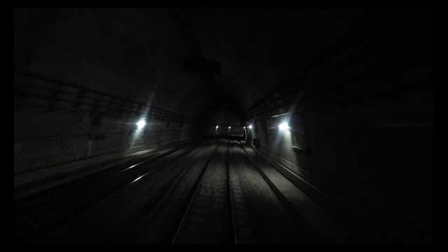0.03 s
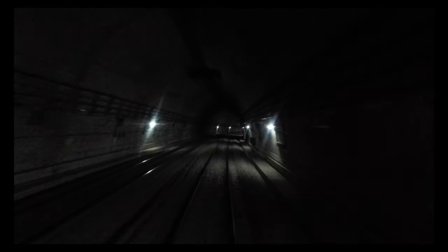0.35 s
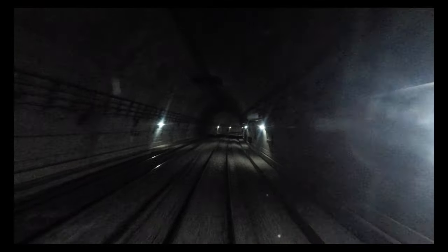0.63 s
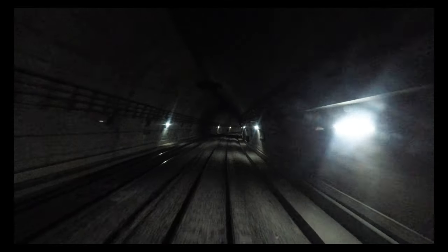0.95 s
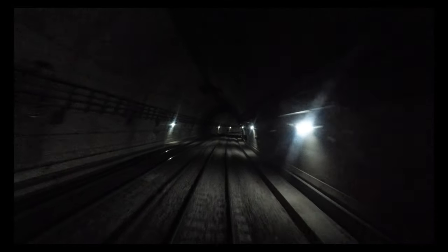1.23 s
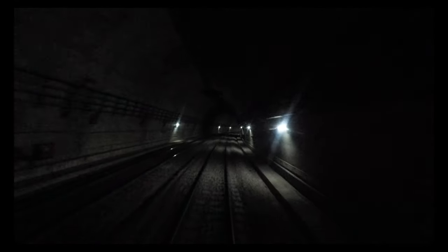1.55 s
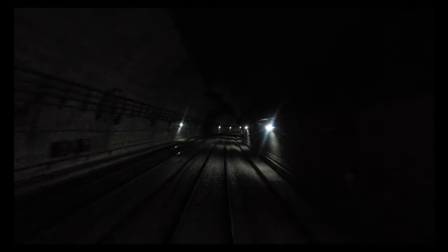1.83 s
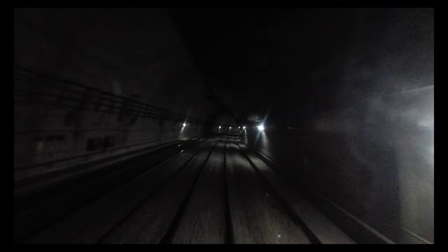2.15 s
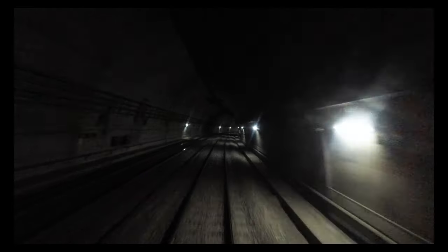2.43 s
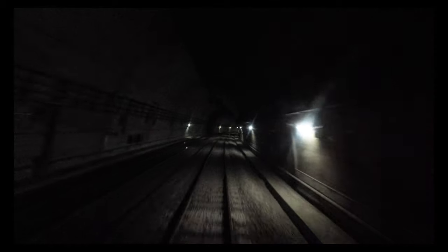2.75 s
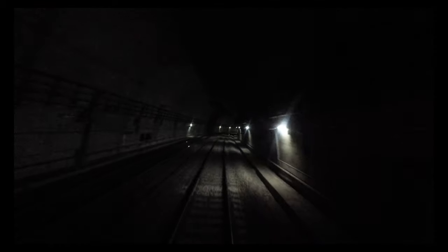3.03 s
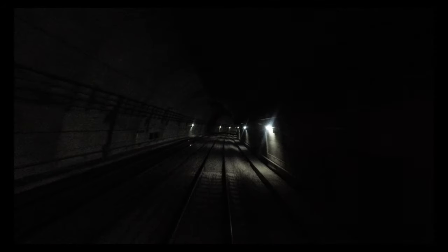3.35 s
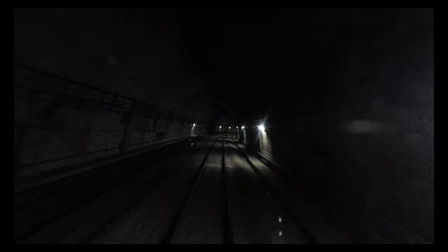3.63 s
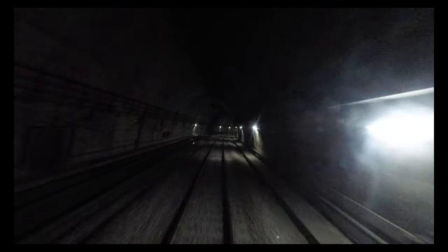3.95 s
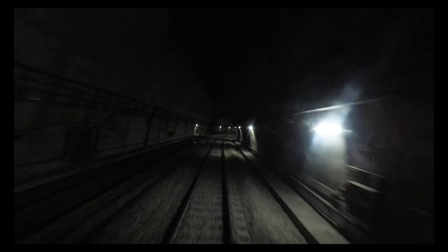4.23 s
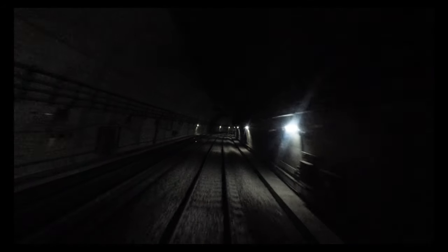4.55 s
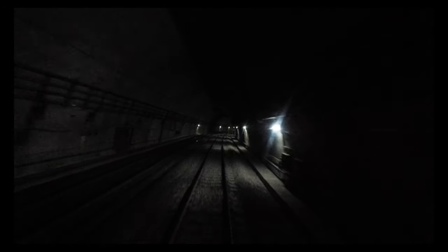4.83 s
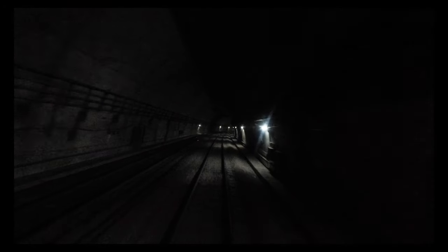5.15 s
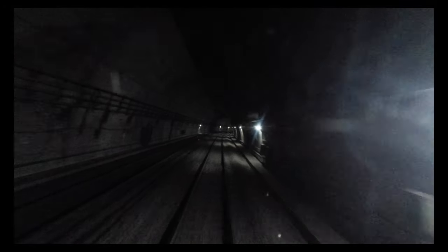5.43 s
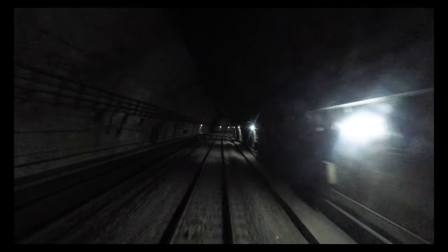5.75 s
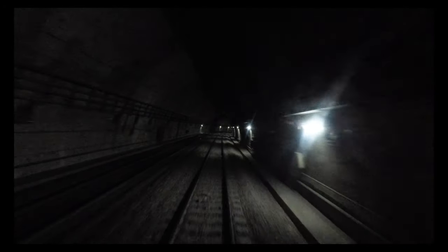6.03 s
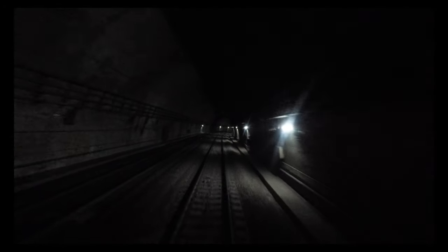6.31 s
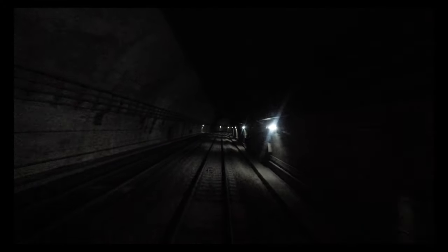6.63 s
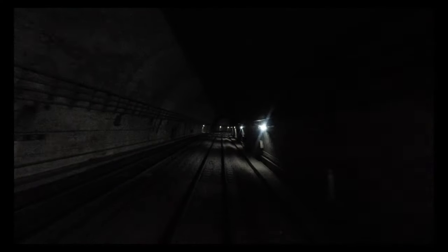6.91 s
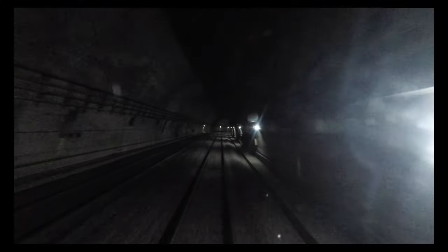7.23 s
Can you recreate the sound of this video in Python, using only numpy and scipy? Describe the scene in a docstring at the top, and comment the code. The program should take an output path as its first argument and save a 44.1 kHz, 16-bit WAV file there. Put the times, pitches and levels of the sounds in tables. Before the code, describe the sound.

Inside a train cab in a tunnel, a steady diesel drone and humming panels blend with rumbling wheels and faint rail hiss.

```python
"""A deep engine drone and a rumble of wheels fill the cab of a diesel train running through a tunnel.
The six-cylinder engine turns at a steady speed, ticking, clattering and making the cab panels hum.
The wheels rumble through the floor, their roar comes back off the tunnel wall, and air hisses past.
Uneven rail adds faint ringing hisses, the first just ahead of a double clack; later comes a dull bump."""
import sys
import numpy as np
from scipy import signal
from scipy.fft import rfft, irfft
from scipy.io import wavfile

SR = 44100
rng = np.random.default_rng(int(sys.argv[2]) if len(sys.argv) > 2 else 0)


def store_wav(level_fs):
    """Save 16-bit WAV to argv[1]."""
    pcm = np.round(np.clip(np.atleast_2d(level_fs), -1, 1) * 32767)
    wavfile.write(sys.argv[1], SR, pcm.T.astype(np.int16))


N = 321048
TIME = np.arange(N) / SR
FREQS = np.maximum(np.arange(N // 2 + 1) * SR / N, 1)

# Each cylinder fires once per engine cycle. An "order" is a tone at a whole multiple of the cycle rate.
CYCLE_HZ = 12.6015
BOOM_ORDERS, WHINE_ORDERS = (7, 12), (66, 67)
LOWER_BOOM_DB, UPPER_BOOM_DB, WHINE_DB = -26, -23, -43
SURGE_START_S, SURGE_RISE_S, SURGE_HOLD_S, SURGE_FALL_S, SURGE_DB = 2.35, 0.51, 0.54, 0.44, 7
SWAY_DB, SWAY_DB_PER_S = 1.5, -0.23

# Low engine tones (the two booming ones take their levels from above): order, relative_level_db
DRONE_TONES = [(2, -38.2), (3, -34.4), (4, -40.6), (5, -28.3), (6, -39.2), (7, -25.1), (8, -27.7),
               (9, -35.1), (10, -27.7), (11, -34.8), (12, -23.3), (13, -38.5), (14, -39.2), (15, -38.2),
               (16, -30.0), (17, -36.7), (18, -33.8), (20, -36.4)]
# Higher engine tones that set the cab panels humming: order, relative_level_db
HUM_TONES = [(28, -51), (30, -41.5), (31, -39), (32, -46), (33, -47), (35, -45), (37, -48), (39, -49),
             (45, -52), (51, -46), (53, -52), (54, -51), (55, -50.5), (59, -50), (63, -53), (64, -54),
             (73, -58), (78, -59), (83, -57.5), (90, -61), (94, -60), (101, -63), (105, -64)]
# Moments when the panel whine swells: middle_s, half_length_s, boost_db
WHINE_RISES = [(.55, 0.51, 4.5), (5.75, 0.2, 4.5)]
# Pitches the cab panels strengthen or weaken: pitch_hz, width_hz, boost_db
PANEL_RINGS = [(395, 50, 2), (505, 25, 3), (665, 50, 4), (720, 18, -3), (745, 20, 4), (770, 18, -3),
               (829, 30, 3), (930, 40, 3), (1003, 25, -4), (1045, 25, 6), (1082, 20, -3), (1130, 30, 4),
               (1185, 22, 3), (1275, 30, 5), (2160, 260, 3.5), (3880, 130, 5), (5870, 180, 3)]
# Tone colour of the engine's clatter: pitch_hz, level_db
CLATTER_SPECTRUM = [(200, -100), (340, -82), (450, -79.5), (600, -72.5), (850, -78.5), (1000, -76.5),
                    (1300, -92), (1750, -95), (2000, -88), (2600, -99), (4000, -99), (7000, -120)]
# Each cylinder's fuel injection tick, in firing order: relative_level_db
TICK_LEVELS = [0, -10, -6, -12, -7, -13]
# How the engine block rings: pitch_hz, width_hz, relative_level_db
BLOCK_RINGS = [(2102, 125, 0), (2230, 100, -6), (3880, 110, -17)]
# Tone colour of the swaying train body: pitch_hz, level_db
SWAY_SPECTRUM = [(5, -65), (12, -57), (18, -49), (28, -48.5), (38, -45.5), (52, -52), (68, -52), (100, -70),
                 (200, -110)]
# Lurches that rock the body: middle_s, half_length_s, boost_db
BODY_LURCHES = [(1.95, 0.21, 4), (3.55, 0.2, 9), (4.8, 0.14, 1)]
# Wheel rumble as the ride roughens and eases: time_s, level_db
RUMBLE_LEVELS = [(0, -22.5), (1.1, -26), (2.5, -27), (3.55, -21.5), (4.6, -25), (5.3, -30.5), (6.0, -28.5),
                 (7.28, -31.5)]
# Tone colour of the rumbling floor: pitch_hz, level_db
FLOOR_SPECTRUM = [(60, -79.5), (90, -49), (125, -57), (147, -48), (180, -50.5), (225, -54.5), (275, -63.5),
                  (330, -83), (600, -115)]
# Tone colour of the roar off the tunnel wall: pitch_hz, level_db
ROAR_SPECTRUM = [(150, -100), (310, -71), (375, -59), (490, -62.5), (560, -66), (850, -67), (1000, -73),
                 (1350, -75.5), (1800, -81.5), (2300, -80.5), (2800, -88), (4000, -90), (5200, -106),
                 (9000, -130)]
# Tone colour of the passing air: pitch_hz, level_db
AIR_SPECTRUM = [(2000, -125), (4500, -96), (5100, -99), (6200, -97), (7100, -101), (8400, -97),
                (10000, -100), (11300, -107), (14000, -112), (15200, -118)]
# A dull bump, then wheels hissing on the rail: start_s, rise_s, decay_s, level_db, pitch_hz, width_hz
RAIL_BURSTS = [(1.73, 0.06, 0.099, -38, 290, 80), (0.12, 0.07, 0.06, -62, 6560, 2000),
               (1.84, 0.07, 0.10, -62, 6500, 1500), (3.42, 0.06, 0.26, -63, 6540, 5000),
               (4.27, 0.17, 0.15, -61.5, 5200, 3000), (5.19, 0.02, 0.13, -65, 6500, 1100),
               (5.19, 0.02, 0.06, -64, 9500, 6000), (6.39, 0.04, 0.05, -65, 6150, 900)]
# The two blows of the track's clack: start_s, strength_db
CLACK_BLOWS = [(0.388, -29.5), (0.402, -34.5)]
# How the frame under the cab rings when struck: pitch_hz, width_hz, relative_level_db
FRAME_RINGS = [(503, 12, 4), (630, 70, -2), (810, 100, -2), (1120, 170, -8), (1730, 200, -17),
               (2020, 140, -18)]


def from_db(db):
    """Turn decibels into a number to multiply by."""
    return 10 ** (np.asarray(db) / 20)


def rms_one(x):
    """Scale a signal so its average level (rms) is 1."""
    return x / np.sqrt(np.mean(x ** 2) + 1e-20)


def drift(rate_hz):
    """A slow random wander, about 1 in size."""
    r = np.exp(-80 * np.pi * rate_hz / SR)
    noise = rng.standard_normal(N // 40 + 2002)   # one value every 40 samples, plus time to settle
    slow = signal.lfilter([1], [1, -2 * r, r * r], noise)[2000:]
    return np.interp(np.arange(N) / 40, np.arange(len(slow)), rms_one(slow))


def swells(rows):
    """Smooth rises and falls of level, in dB."""
    return sum(db * np.exp(-((TIME - s) / half_s) ** 2) for s, half_s, db in rows)


def burst(start_s, rise_s, decay_s):
    """A level that climbs in a straight line, then dies away."""
    age = TIME - start_s
    return np.clip(age / rise_s, 0, 1) * np.exp(-np.maximum(age - rise_s, 0) / decay_s)


def resonate(x, hz, width_hz):
    """Make a signal ring at one pitch; a narrower width rings longer."""
    r = np.exp(-np.pi * width_hz / SR)
    feedback = [1, -2 * r * np.cos(2 * np.pi * hz / SR), r * r]
    return signal.lfilter(np.array([1, 0, -1]) * (1 - r * r) / 2, feedback, x)


def narrow_noise(hz, width_hz):
    """Noise gathered around one pitch."""
    once = resonate(rng.standard_normal(N), hz, width_hz)
    return rms_one(resonate(once, hz, width_hz))


def colour(white, spectrum, peaks=()):
    """Give an even, hiss-like signal a tone colour, with extra peaks and dips."""
    hz, level_db = np.transpose(spectrum)
    shape_db = np.interp(np.log(FREQS), np.log(hz), level_db, right=-160)
    for peak_hz, width_hz, peak_db in peaks:
        shape_db += peak_db / (1 + (2 * (FREQS - peak_hz) / width_hz) ** 2)
    return irfft(rfft(white) * from_db(shape_db) * np.sqrt(SR / 2), N)


def engine_tone(cycles, order, waver_db):
    """One pure tone that keeps step with the engine and can waver in level."""
    lag = .078 * order * order   # higher tones arrive later through the body, blurring the firings
    tone = np.sqrt(2) * np.cos(2 * np.pi * (order * cycles - lag))
    return tone * from_db(waver_db * drift(1.22))


def drone(cycles):
    """Low engine tones fill the cab; higher ones hum in its panels."""
    low = sum(from_db(db) * engine_tone(cycles, order, waver_db=1.1)
              for order, db in DRONE_TONES if order not in BOOM_ORDERS)
    hum = sum(from_db(db) * engine_tone(cycles, order, waver_db=2.6) for order, db in HUM_TONES)
    return from_db(-0.46) * low + from_db(-1.06) * hum


def boom(cycles):
    """Two engine tones match pitches at which the cab's air rings; the lower one surges once."""
    age = TIME - SURGE_START_S
    rise = np.clip(age / SURGE_RISE_S, 0, 1)
    fall = np.clip((age - SURGE_RISE_S - SURGE_HOLD_S) / SURGE_FALL_S, 0, 1)
    lower = engine_tone(cycles, BOOM_ORDERS[0], waver_db=1.4)
    upper = engine_tone(cycles, BOOM_ORDERS[1], waver_db=0.0)
    return from_db(LOWER_BOOM_DB + SURGE_DB * (rise - fall)) * lower + from_db(UPPER_BOOM_DB) * upper


def panel_whine(cycles):
    """Two close tones throb against each other in one panel, which running noise also stirs."""
    strong, weak = (engine_tone(cycles, order, waver_db=2.0) for order in WHINE_ORDERS)
    whine = strong + from_db(-3.5) * weak + from_db(-4) * narrow_noise(hz=828, width_hz=36)
    return from_db(WHINE_DB + swells(WHINE_RISES)) * rms_one(whine)


def clatter(cycles):
    """All the fainter engine tones jumble into a rattle that repeats every cycle."""
    orders = np.exp(2j * np.pi * rng.random(600))   # equally strong, randomly timed
    already_played = [order for order, db in DRONE_TONES + HUM_TONES] + list(WHINE_ORDERS)
    orders[already_played] = 0
    pattern = irfft(orders, int(SR / CYCLE_HZ)) * np.sqrt(SR / CYCLE_HZ)
    rattle = np.interp(cycles * len(pattern), np.arange(len(pattern)), pattern, period=len(pattern))
    return colour(rattle, CLATTER_SPECTRUM, PANEL_RINGS)


def injection_ticks(cycles, first_s, decay_s, rattle_gain, level_db):
    """Six unequal fuel injection ticks ring the engine block, nearly alike in every cycle."""
    cylinders = len(TICK_LEVELS)
    firing = (cycles - first_s * CYCLE_HZ) * cylinders
    tick_number = np.floor(firing).astype(int)
    strength = from_db(TICK_LEVELS)[tick_number % cylinders]
    age = firing % 1 / (CYCLE_HZ * cylinders)
    blows = rms_one(np.diff(tick_number, prepend=tick_number[0]) * strength)
    rattle = rms_one(strength * np.exp(-age / decay_s) * rng.standard_normal(N))
    force = blows + rattle_gain * rattle
    # the block rings, then its mounting, so each tick swells softly
    rings = sum(from_db(db) * resonate(resonate(force, hz, width), hz, width)
                for hz, width, db in BLOCK_RINGS)
    return from_db(level_db) * rms_one(rings)


def engine():
    """One shaft, held at an almost steady speed, sets the pace of every engine sound."""
    cycles = CYCLE_HZ * TIME + .0004 * drift(.8)   # cycles completed so far
    rattle = clatter(cycles)
    ticks = injection_ticks(cycles, first_s=.0105, decay_s=0.01, rattle_gain=0.51, level_db=-52.5)
    return drone(cycles) + boom(cycles) + panel_whine(cycles) + rattle + ticks


def running_noise():
    """The body sways, wheels rumble through the floor, the tunnel returns their roar, air rushes by."""
    sway_db = SWAY_DB + SWAY_DB_PER_S * TIME + swells(BODY_LURCHES)
    sway = colour(rng.standard_normal(N), SWAY_SPECTRUM) * from_db(sway_db)
    rumble_db = np.interp(TIME, *np.transpose(RUMBLE_LEVELS))
    wheels = narrow_noise(hz=95, width_hz=35) * from_db(rumble_db)
    floor = colour(rng.standard_normal(N), FLOOR_SPECTRUM)
    roar = colour(rng.standard_normal(N), ROAR_SPECTRUM, PANEL_RINGS) * from_db(0.5 * drift(4.9))
    air = colour(rng.standard_normal(N), AIR_SPECTRUM, PANEL_RINGS) * from_db(.25 * drift(5.6))
    return sway + wheels + floor + roar + air


def rail_noises():
    """Uneven stretches of rail each stir up a brief hiss or a dull bump."""
    return sum(from_db(db) * burst(start, rise, decay) * narrow_noise(hz, width)
               for start, rise, decay, db, hz, width in RAIL_BURSTS)


def track_clack(muffle_hz=1730):
    """Two quick rattling blows ring the frame under the cab; the floor muffles them."""
    blows = sum(from_db(db) * burst(start, rise_s=0.0014, decay_s=0.029) for start, db in CLACK_BLOWS)
    force = blows * rng.standard_normal(N)
    # a narrow ring catches less of the rattle; the square root makes up for that
    rings = sum(from_db(db) * np.sqrt(SR / np.pi / width) * resonate(force, hz, width)
                for hz, width, db in FRAME_RINGS)
    return signal.sosfilt(signal.butter(6, muffle_hz, fs=SR, output="sos"), rings + 1e-18)


def scene():
    """All the sounds meet at one spot in the cab."""
    return (engine() + running_noise() + track_clack() + rail_noises())[None]


def record(dry):
    """Cut away the highest treble, above 15200 Hz."""
    return signal.sosfilt(signal.ellip(10, .1, 80, 15200, fs=SR, output="sos"), dry)


dry = scene()
out = record(dry)
store_wav(out)
```